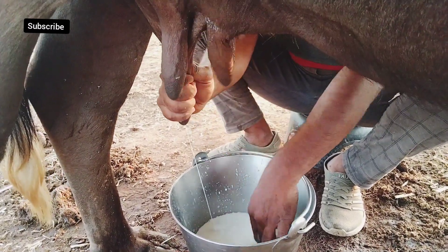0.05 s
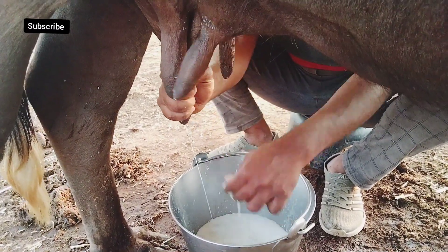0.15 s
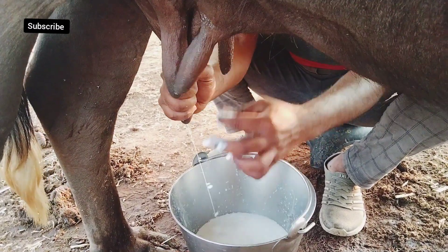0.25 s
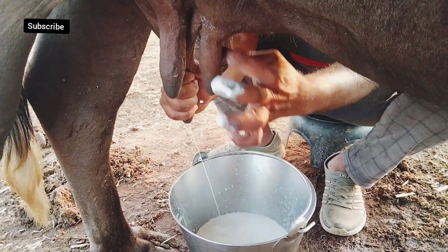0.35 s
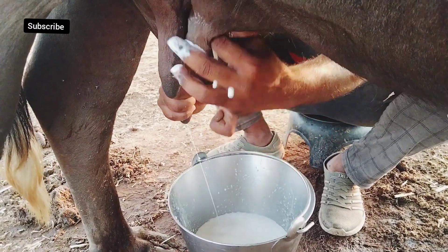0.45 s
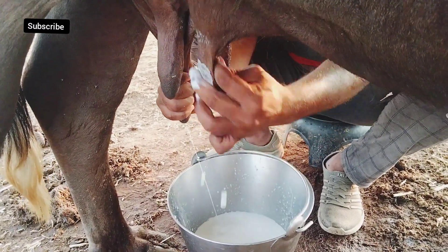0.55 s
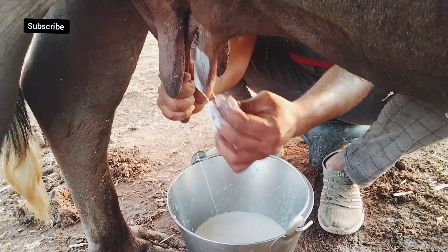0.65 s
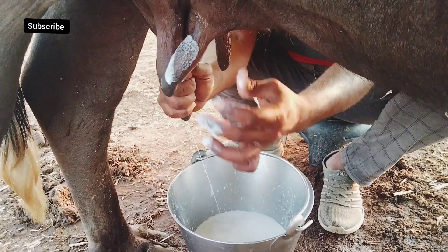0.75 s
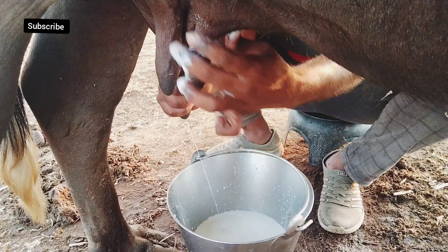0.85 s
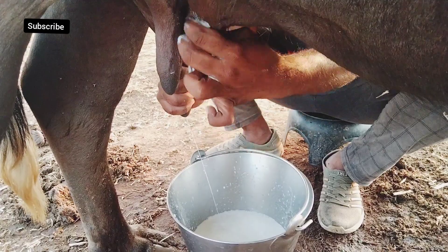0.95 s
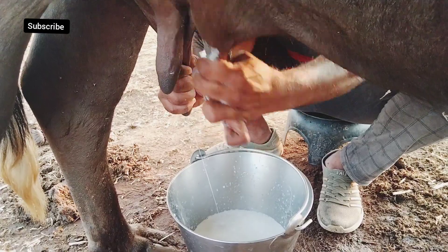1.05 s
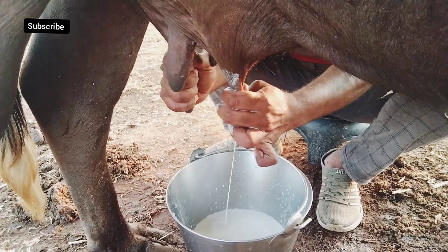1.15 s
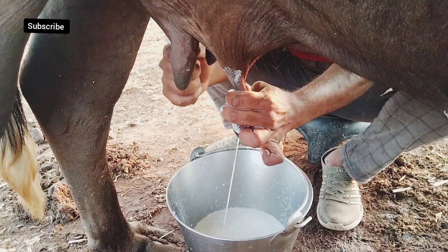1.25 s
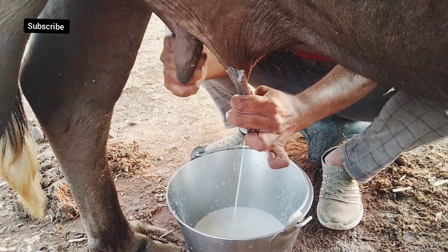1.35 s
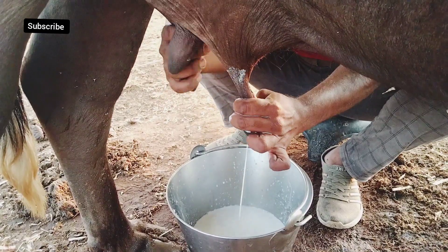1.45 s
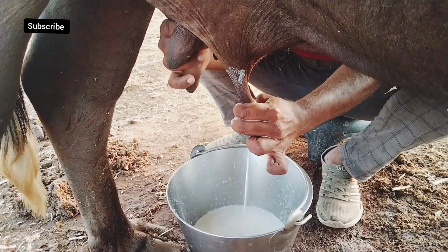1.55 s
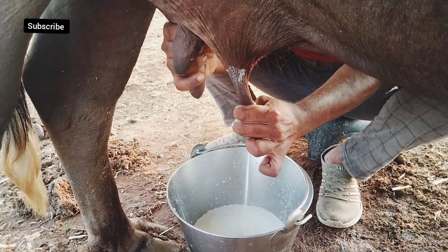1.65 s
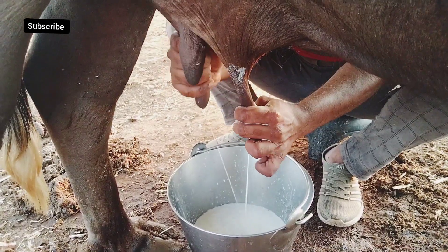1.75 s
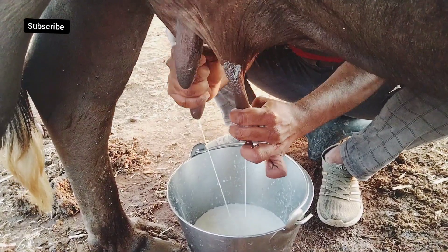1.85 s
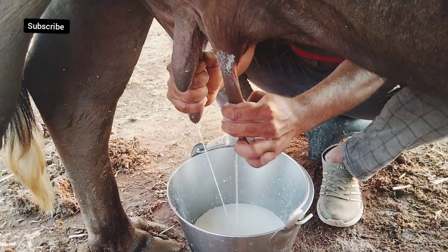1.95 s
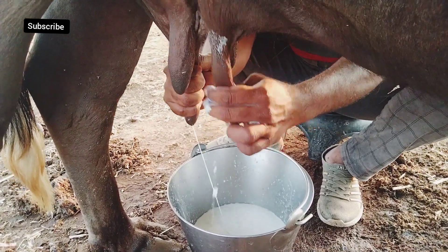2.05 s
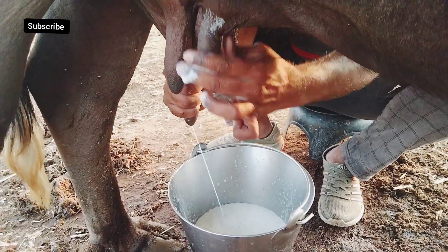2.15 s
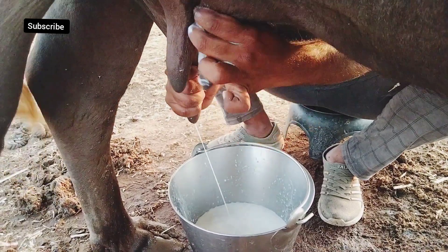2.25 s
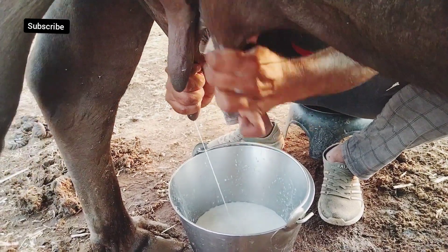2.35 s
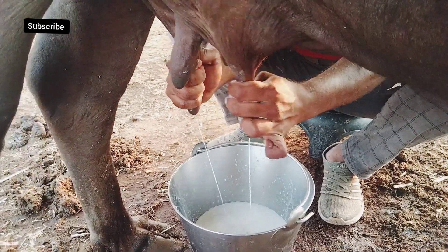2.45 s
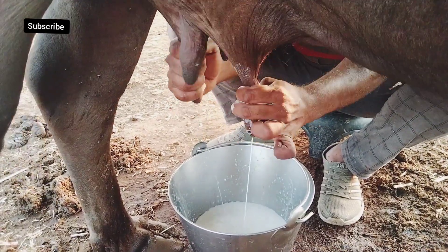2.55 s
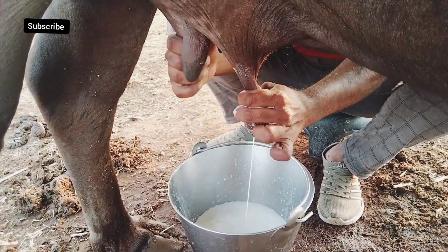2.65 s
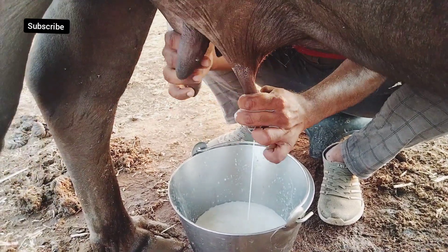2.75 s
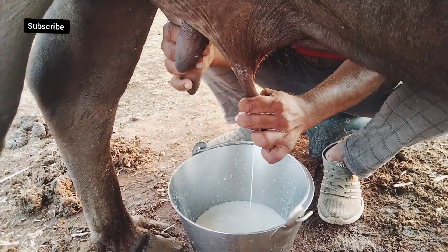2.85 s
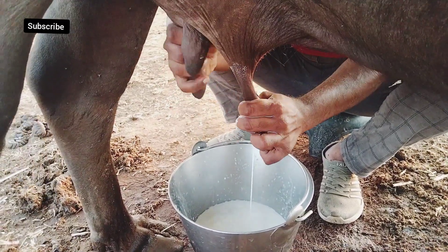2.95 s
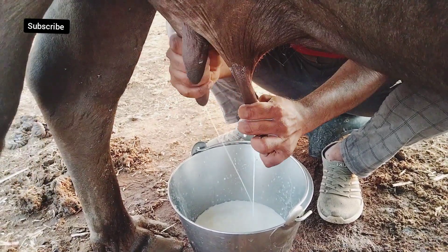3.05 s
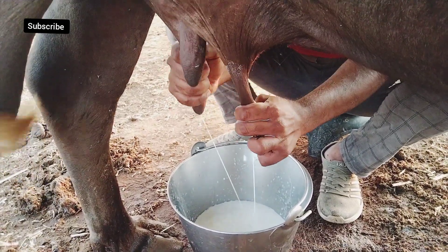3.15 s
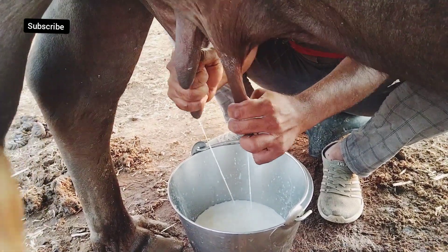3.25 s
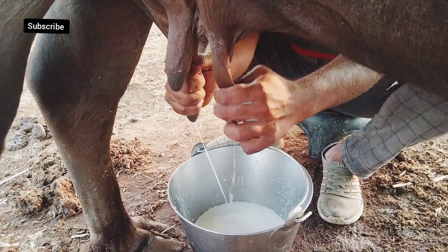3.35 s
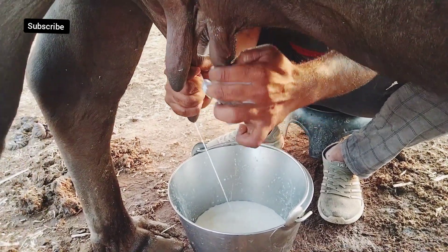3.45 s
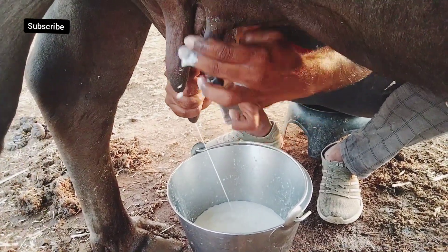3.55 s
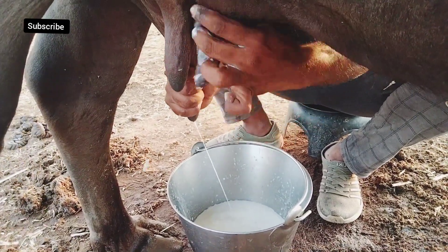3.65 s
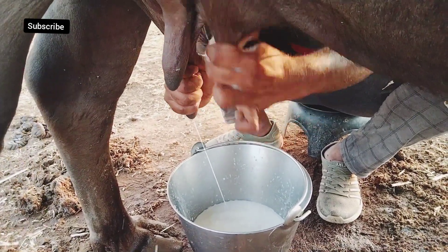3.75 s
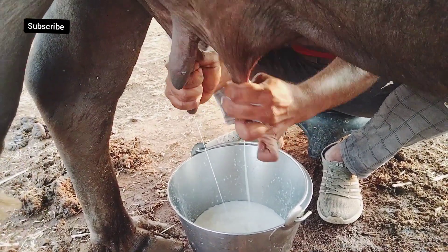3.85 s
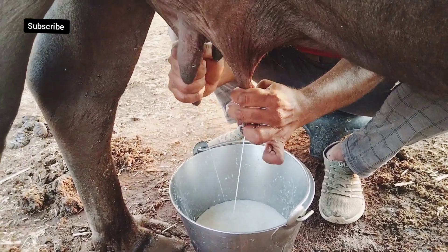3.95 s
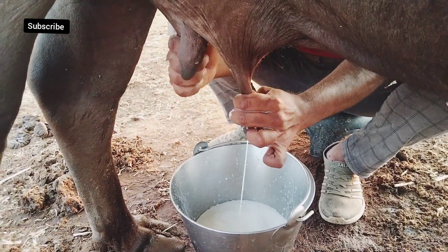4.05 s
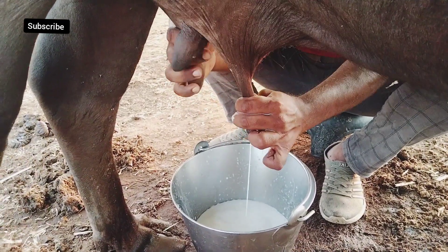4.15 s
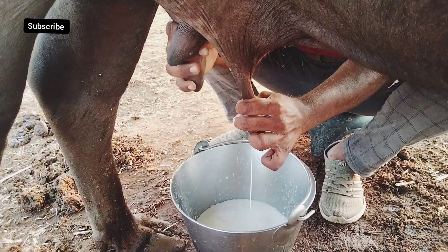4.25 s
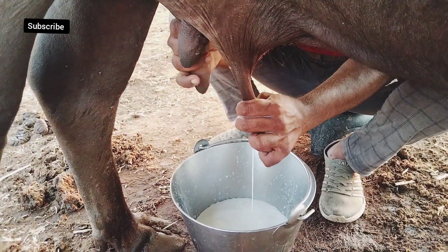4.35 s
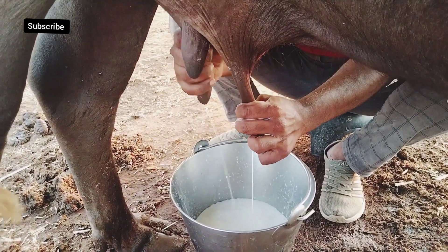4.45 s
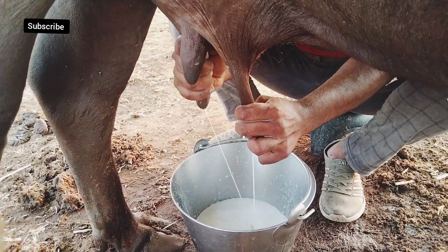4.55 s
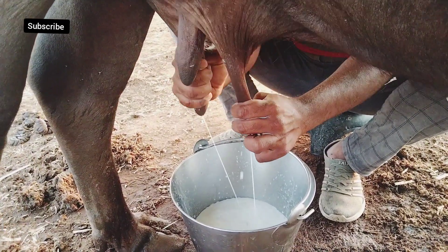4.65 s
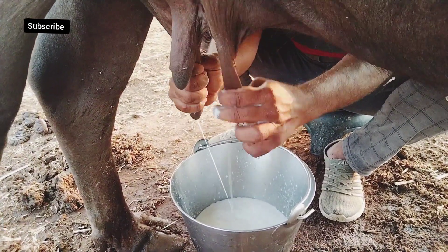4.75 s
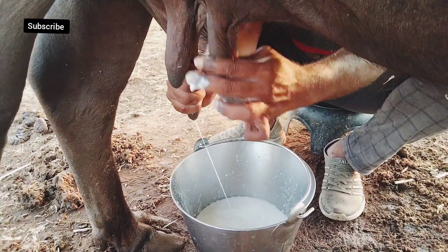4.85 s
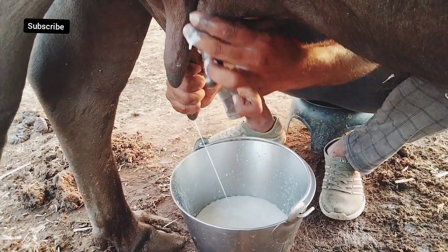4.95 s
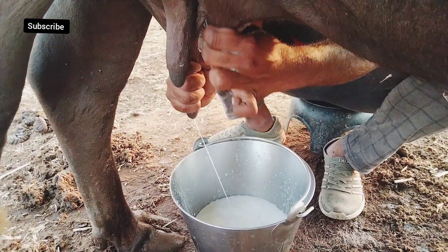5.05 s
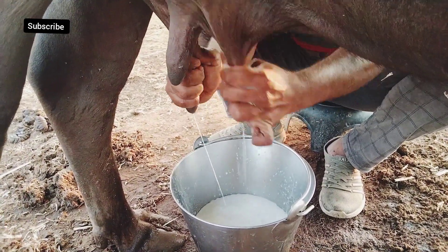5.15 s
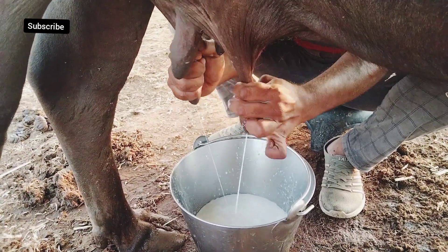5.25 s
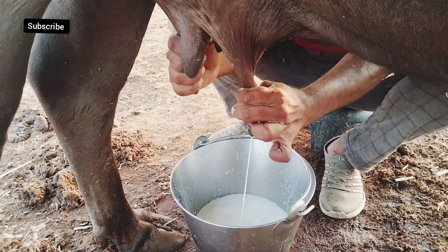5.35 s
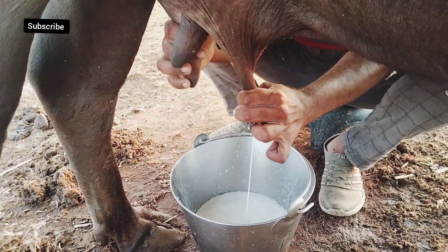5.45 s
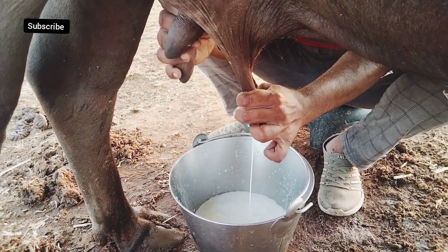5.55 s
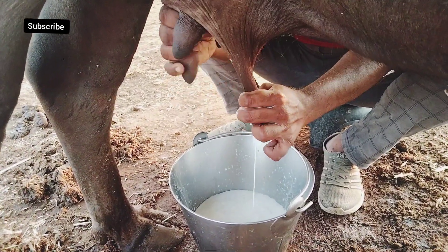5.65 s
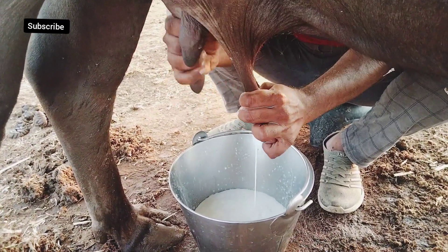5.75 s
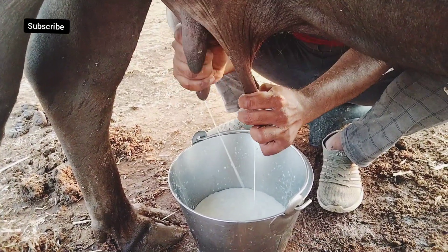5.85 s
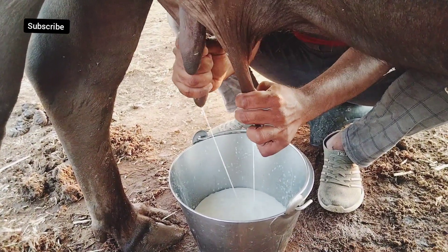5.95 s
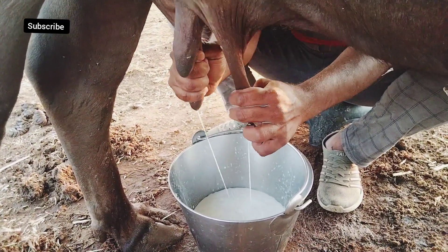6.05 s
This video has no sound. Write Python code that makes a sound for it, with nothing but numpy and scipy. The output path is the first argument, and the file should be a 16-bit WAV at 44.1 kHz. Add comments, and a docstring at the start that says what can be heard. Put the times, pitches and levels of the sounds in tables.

```python
"""A thin jet of milk dies away in a half-full steel bucket outdoors; a small neck bell is struck, far birds chirp,
then two hand-milked jets spurt in turn, close to a phone. Random impacts of the broken jets excite resonances of
the air over the milk and of the steel wall; foam bubbles, gulps and the bell are decaying tones, splats and mist
shaped noise, thuds a low tone with rumble. Thin whistles rise as some spurts run out; the bell sounds once more."""
import sys
import numpy as np
from scipy import signal
from scipy.fft import rfft, irfft
from scipy.io import wavfile
from scipy.ndimage import uniform_filter1d, minimum_filter1d

SR = 44100
rng = np.random.default_rng(int(sys.argv[2]) if len(sys.argv) > 2 else 0)


def ratio(d):
    """dB to gain"""
    e = np.asarray(d, float) / 20
    return 10 ** e


def wav_out(sig):
    """Save sig, one row per channel (or a flat mono array), as 16-bit PCM at SR to the path in sys.argv[1]."""
    wavfile.write(sys.argv[1], SR, np.round(np.clip(np.atleast_2d(sig).T, -1, 1) * 32767).astype(np.int16))


N = 269451
T = np.arange(N) / SR


def unit(x):
    """Normalisation to an rms of 1."""
    return x / np.sqrt(np.mean(x ** 2))


def add(out, s, burst):
    """Superposition: mix a burst in at time s."""
    i = int(s * SR)
    out[i:i + len(burst)] += burst[:N - i]


def resonate(x, peaks):
    """Parallel second-order resonances (f/Hz, width/Hz, level/dB), summed with alternating sign."""
    out = 0
    for k, (hz, width, db) in enumerate(peaks):
        b, a = signal.iirpeak(hz, hz / width, SR)
        out = out + (-1) ** k * ratio(db) * signal.lfilter(b, a, x)
    return out


def ring(x, hz, width):
    """Two resonances in cascade give one with steep skirts, at an rms of 1."""
    once = resonate(x, [(hz, width, 0)])
    return unit(resonate(once, [(hz, 2 * width, 0)]))


def colour(x, points):
    """Spectral shaping: weight x by a curve of (f/Hz, level/dB) and set its rms to 1."""
    hz, db = np.transpose(points)
    log_f = np.log(np.fft.rfftfreq(N, 1 / SR) + 1)
    return unit(irfft(rfft(x) * ratio(np.interp(log_f, np.log(hz), db)), N))


def walk(rate):
    """Slow random modulation: levels held for 1 / rate s, smoothed twice, rms 1."""
    hold = int(SR / rate)
    steps = np.repeat(rng.standard_normal(N // hold + 1), hold)
    smooth = uniform_filter1d(uniform_filter1d(steps, hold), hold)
    return unit(smooth[:N])


def swell(start, length):
    """Half-sine envelope: a soft rise and fall between 0 and 1."""
    return np.abs(np.sin(np.pi * np.clip((T - start) / length, 0, 1)))


def patter(per_s, spread_db, hiss):
    """Shot noise: random impacts of uneven, bounded size over a share of smooth noise."""
    hit = rng.random(N) < per_s / SR
    size = np.minimum(rng.exponential(size=N), 3)
    sign_noise, smooth_noise = rng.standard_normal((2, N))
    return unit(hit * ratio(spread_db * size) * np.sign(sign_noise)) + hiss * smooth_noise


def glide(length, hz0, hz1, wobble_db, shake_hz=25, ease=0):
    """Frequency modulation: an unsteady tone slides from hz0 to hz1; ease slows both ends of the slide."""
    t = T[:int(length * SR)]
    shake = unit(uniform_filter1d(rng.standard_normal(N // 4), size=110))[:len(t)]
    way = t / length - ease * np.sin(2 * np.pi * t / length) / (2 * np.pi)
    hz = hz0 + (hz1 - hz0) * way + shake_hz * shake
    tone = np.sin(2 * np.pi * np.cumsum(hz) / SR)
    return t, tone * np.sqrt(np.sin(np.pi * t / length)) * ratio(wobble_db * shake[::-1])


def field():
    """Broadband noise: faint, wavering outdoor air."""
    # spectrum of the air: f/Hz, relative density/dB
    air_spectrum = [(40, 4), (450, 3), (1700, 0.5), (15500, -12)]
    return colour(rng.standard_normal(N), air_spectrum) * ratio(-73 + 1.5 * walk(8))


def birds():
    """Frequency glides with amplitude warble, scattered into a faint tail of echoes from around the yard."""
    # chirps: start t/s, length t/s, from f/Hz, to f/Hz, level/dB, warble f/Hz
    chirps = [(0.501, 0.12, 3840, 3070, -71.5, 23), (0.672, 0.08, 3660, 3120, -63, 40),
              (0.86, 0.27, 4340, 4330, -75, 44), (1.051, .11, 3780, 2970, -55, 50),
              (1.556, 0.061, 3200, 2930, -66, 44)]
    out = np.zeros(N)
    for s, length, hz0, hz1, db, warble in chirps:
        t, tone = glide(length, hz0, hz1, wobble_db=0.0)
        add(out, s, ratio(db) * tone * (1 + .5 * np.sin(2 * np.pi * warble * t)))
    t = T[:SR // 4]
    echoes = ratio(-43.0) * rng.standard_normal(len(t)) * np.exp(-t / 0.067)
    return out + signal.fftconvolve(out, echoes)[:N]


def thuds():
    """Damped oscillation: dull blows through the ground, a very short low tone over decaying rumble."""
    # hoof or knee on the ground: t/s, level/dB, f/Hz, rumble t60/s
    blows = [(0.366, -40, 191, 0.39), (2.862, -37, 174.5, 0.42)]
    out, t = np.zeros(N), T[:SR // 3]
    for s, db, hz, t60 in blows:
        knock = np.sin(2 * np.pi * hz * t) * np.exp(-t / 0.0092)
        rumble = 0.33 * ring(rng.standard_normal(len(t)), hz, 1.1 * hz)
        add(out, s, ratio(db) * (knock + rumble * 1000. ** (-t / t60)))
    return out


def bell():
    """Modal vibration: each blow is a bright clapper tick, then close pairs of modes that beat and fade."""
    # modes in close pairs: f/Hz, level/dB, t60/s,
    # lean (how far the clapper's favour raises or lowers the mode), share of the level change
    modes = [(1954, -5.5, 3.05, -1.3, 0.45), (2004, 8.5, 1.27, 0.31, 1.48), (5060, -7.5, 0.96, -0.51, 0.56),
             (5014, 4.5, 1.22, 0.36, 0.18), (9075, 8, 0.64, -0.49, 0.083), (9114, 3.5, 0.42, 0.88, 0.47),
             (14150, -2, 0.44, -0.51, .05), (14200, 3, 0.35, 1, .05)]
    # blows: t/s, level/dB, clapper's favour level/dB, then an extra level change:
    # level before/dB, level after/dB, wait until it changes t/s
    blows = [(0.644, -44.5, -3.5, -14, -0.5, 0.086), (4.001, -51, 13, -0.5, -40, 0.11)]
    change_s = 0.21  # the low modes swell after the first blow and fade fast after the second
    out = np.zeros(N)
    for s, db, favour_db, before_db, after_db, wait in blows:
        t = np.maximum(T - s, 0)
        change_db = before_db + (after_db - before_db) * np.clip((t - wait) / change_s, 0, 1)
        tick = ring(rng.standard_normal(N), 5700, 5400) * np.minimum(t / 0.002, 1) * np.exp(-t / 0.012)
        out += ratio(db - 5) * tick
        for hz, mode_db, t60, lean, share in modes:
            tone = np.sin(2 * np.pi * hz * t) * np.minimum(t / 0.006, 1) * 1000. ** (-t / t60)
            out += ratio(db + mode_db + lean * favour_db + share * change_db) * tone
    return out


def whistles():
    """Frequency glide with noisy amplitude: thin, breathy rising tones near the end of some spurts."""
    # tones: start t/s, length t/s, from f/Hz, to f/Hz, level/dB, pitch shake f/Hz
    rising_tones = [(1.88, 0.11, 3450, 5120, -49.5, 51), (2.408, 0.18, 6250, 6900, -68, 30),
                    (2.641, .32, 6930, 7800, -58, 420), (3.782, 0.16, 4900, 6430, -66.5, 45.3),
                    (5.081, 0.27, 3510, 5200, -61.5, 45)]
    out = np.zeros(N)
    for s, length, hz0, hz1, db, shake_hz in rising_tones:
        tone = glide(length, hz0, hz1, wobble_db=3, shake_hz=shake_hz, ease=.7)[1]
        breath = unit(uniform_filter1d(rng.standard_normal(N // 4), 150))[:len(tone)]
        add(out, s, ratio(db) * tone * (1 + 0.45 * breath))
    return out


def splats():
    """Decaying noise: drops and slaps are short bursts around a centre with a little broad noise."""
    # drops and slaps on foam and wall: t/s, level/dB, centre f/Hz
    slaps = [(0.18, -60, 3500), (0.2787, -57.5, 1940), (0.366, -43.5, 3060), (0.381, -43.5, 2720),
             (0.547, -54.5, 6500), (0.8163, -55, 2780), (1.24, -60, 2140), (1.273, -41, 1880),
             (1.74, -34.5, 2540), (2.1278, -32, 2270), (2.139, -35.5, 4800), (2.1755, -35, 2700),
             (2.4405, -62, 12500), (2.4953, -53, 13400), (2.578, -42.5, 4850), (2.5635, -39.5, 1950),
             (2.594, -39.5, 2960), (2.6157, -36.5, 1170), (2.682, -43.5, 2670), (3.5233, -30.5, 2520),
             (3.917, -61, 9000), (4.018, -41, 4900), (4.473, -42, 4960), (4.5262, -41, 2450),
             (4.839, -55, 5800), (4.9977, -42, 2500), (5.31, -47, 4800), (5.3813, -34.5, 1470),
             (5.4116, -30, 2050), (5.479, -41, 1700), (5.618, -35.5, 2000)]
    out, t = np.zeros(N), T[:SR // 5]
    for s, db, hz in slaps:
        noise = rng.standard_normal(len(t))
        body = ring(noise, hz, 0.71 * hz) + 0.04 * np.diff(noise, prepend=0)
        add(out, s, ratio(db) * body * np.minimum(t / 0.002, 1) * 1000. ** (-t / 0.059))
    return out


def gulps():
    """Bubble resonance: air dragged under swells, rings a few cycles and rises in pitch."""
    # big bubbles: t/s, level/dB, starting f/Hz
    big_bubbles = [(1.275, -30.5, 420), (1.298, -27, 445), (1.319, -28.5, 373), (1.479, -31, 429),
                   (1.372, -33.5, 354), (1.548, -26.5, 445), (2.663, -27, 357), (2.739, -26.5, 385),
                   (3.406, -31.5, 424), (3.445, -30.5, 405), (4.033, -23.5, 345), (4.18, -32, 367),
                   (4.638, -23, 421), (5.176, -27.5, 363), (5.426, -29, 411), (5.633, -22.5, 362),
                   (5.798, -31, 563)]
    out, t = np.zeros(N), T[:SR // 10]
    for s, db, hz in big_bubbles:
        shape = t / 0.0042 * np.exp(1 - t / 0.004)
        add(out, s, ratio(db) * shape * np.sin(2 * np.pi * hz * t * (1 + 3 * t)))
    return out


def bubbles(splash_db):
    """Bubble resonance in miniature: foam bubbles burst as short upward glides of very uneven size."""
    count, low_hz, high_hz = 1200, 1095, 2000
    decay_cycles, level_db = 6.1, -8.5  # level against the splash
    out, t = np.zeros(N), T[:SR // 30]
    for when, pitch, size in rng.random((count, 3)):
        cycles = low_hz * (high_hz / low_hz) ** pitch * t
        tone = np.sin(2 * np.pi * cycles * (1 + 0.0077 * cycles))
        tone = tone * np.minimum(cycles / 2.7, 1) * np.exp(-cycles / decay_cycles)
        add(out, when * T[-1], ratio(-9 * size) * tone)
    return unit(out) * ratio(splash_db + level_db)


def spray(missing_db):
    """Band-filtered shot noise: fine mist in treble bands that flicker alone; the lower ones lose more level."""
    # mist: f/Hz, relative band level/dB, extra loss as a share of the missing drive
    mist_bands = [(7640, -5.5, 0.95), (9000, -2.5, 0.67), (10400, -1.5, .2), (11900, -0.5, 0.1),
                  (15400, -0.5, .1)]
    hz, db, loss = np.transpose(mist_bands)
    mist = patter(5000, 4.5, 0.6)
    out = 0
    for k, f in enumerate(np.arange(7600, 15800, 600)):
        band_db = np.interp(f, hz, db) + np.interp(f, hz, loss) * missing_db + 2.8 * walk(22.21)
        out = out + (-1) ** k * ratio(band_db) * ring(mist, f, 480)
    return 0.28 * out


def trickle():
    """Narrow-band resonance: a faint drive lets sharp bands hum alone; foam rustles in the treble."""
    # hum of the bucket air as a last thin jet dies away: t/s, level/dB
    hum_level = [(0, -40.5), (.1, -50.5), (.5, -52.5), (.62, -58), (.9, -59.5), (1.04, -74), (1.1, -110)]
    # narrow bands that hum on for a while: f/Hz, width f/Hz, level/dB, from t/s, to t/s
    narrow_bands = [(264, 26, -69, -1.1, 0.6), (350, 66, -54.5, -0.9, .55), (663, 61, -63.5, -1, .55),
                    (1026, 63, -58, -0.85, 0.3), (1818, 47, -61.5, 0.16, 0.3),
                    (1700, 45, -73.5, 0.52, 0.99), (3405, 73, -65, -1, 0.35), (4330, 80, -77, -.5, 0.75),
                    (5030, 73, -87, -0.9, 0.34)]
    # foam rustles: start t/s, length t/s, level/dB
    foam_rustles = [(0.15, 0.19, -65.5), (0.345, 0.082, -57.5), (.39, 0.11, -70)]
    hum_db = np.interp(T, *np.transpose(hum_level))
    out = ratio(hum_db) * ring(rng.standard_normal(N), 450, 65)
    for hz, width, db, start, end in narrow_bands:
        envelope = ratio(db + 2.3 * walk(38.5)) * np.sqrt(swell(start, end - start))
        out = out + envelope * ring(patter(1500, 4.8, 0.42), hz, width)
    rustle = sum(ratio(db) * swell(s, length) ** 2 for s, length, db in foam_rustles)
    return out + rustle * ratio(3.3 * walk(59.5)) * spray(-1)


def spurts():
    """Energy addition: powers of overlapping spurts (rise, hold, taper, stop) sum to each layer's level in dB."""
    # start t/s, length t/s, rise t/s, taper t/s as the squeeze runs out, plunge level/dB, fizz level/dB
    squeezes = [(-.3, 0.84, 0.04, 0.72, -61.5, -65), (1.228, 1.318, 0.075, 0.28, -39, -56.5),
                (1.354, 0.61, 0.37, 0.12, -60, -46), (2.033, 0.44, 0.095, 0.4, -40, -49.5),
                (2.537, 1.367, 0.01, 0.47, -38, -54.5), (2.663, 1.41, 0.23, 0.73, -46.5, -54),
                (3.924, 1.47, 0.13, 0.46, -39.5, -53), (4.954, 0.15, 0.049, 0.065, -37, -59.5),
                (5.3, 1.34, 0.1, 0.65, -38, -53.5), (5.424, 0.26, 0.082, 0.18, -41.5, -52.5)]
    # plunge, splash, fizz, spray: lag t/s, level over its column/dB, loss per taper_s level/dB, bend of taper
    # (plunge and splash take the plunge column, fizz and spray the fizz column)
    follow = [(0.026, 0, -6.5, 0.94), (0.011, -10, -3.5, 6), (0.0019, 0.5, -14, 1.02), (0, -7, -9.5, 0.78)]
    taper_s, rise_db, stop_s = .35, -13, 0.024
    out = []
    for k, (lag, over_db, lost_db, bend) in enumerate(follow):
        power = 1e-14
        for s, length, rise, taper, *column_db in squeezes:
            t = T - s - lag
            db = column_db[k // 2] + over_db + rise_db * np.clip(1 - t / rise, 0, 1) ** 2
            db = db + lost_db * (np.maximum(t - length + taper, 0) / taper_s) ** bend
            power = power + ratio(2 * db) * (t > 0) * np.clip((length - t) / stop_s, 0, 1) ** 2
        out.append(10 * np.log10(power))
    return out


def spits():
    """Jet break-up: quick random jumps in drive that relax exponentially in a few ms."""
    jumps = (rng.random(N) < 45 / SR) * np.minimum(rng.exponential(size=N), 2.2)
    relaxed = signal.lfilter([1], [1, -np.exp(-1 / (0.0081 * SR))], jumps)
    return uniform_filter1d(relaxed, size=330)


def drift(x, share):
    """Time-warping: pitch wanders by about this share as the foam and the point of impact move."""
    position = np.arange(N) + np.cumsum(share * walk(4.0))
    return np.interp(position % (N - 1), np.arange(N), x)


def sheet_steel(x):
    """Modal density: closely spaced modes of the thin wall add fine streaks to the hiss."""
    t, chance = T[:SR // 8], rng.random((160, 2))
    hz = 1000 + 90 * (np.arange(160)[:, None] + .7 * chance[:, :1])
    modes = np.sin(2 * np.pi * (hz * t + chance[:, 1:]))
    response = modes.sum(axis=0) * 1000. ** (-t / .06)
    return x + .3 * signal.fftconvolve(x, response / np.linalg.norm(response))[:N]


def jets():
    """Forced resonance: drops of the broken jet ring the bucket air and wall; all layers share its sputter."""
    # resonances of the air over the milk: f/Hz, width f/Hz, relative level/dB
    air_modes = [(206.7, 44.6, -8), (308.4, 80.7, -6), (366.5, 41, 1), (445, 51.3, -1), (672, 216, -13.5)]
    # resonances of the steel wall: f/Hz, width f/Hz, relative level/dB
    wall_modes = [(735, 113, -7), (1044, 200, -1), (1276, 214, -0.5), (1600, 220, -11), (2148, 300, 0.5),
                  (2930, 360, 0.5), (3720, 670, -4), (4330, 480, -4.5), (4894, 280, -6), (5460, 510, -5.5),
                  (6060, 1200, -3.5), (7050, 1100, -9.5)]
    # extra loss per wall mode when the drive is weak: share of the missing drive (negative gives some back)
    wall_loss = [-0.46, 0.057, 0.7, -0.74, 0.67, -0.42, 0, .8, -0.32, 0.7, -0.21, -0.51]
    full_fizz_db, wall_db = -57, -5  # drive is missing below full fizz; common offset of the wall modes
    plunge_db, splash_db, fizz_db, spray_db = spurts()
    sputter, spit = walk(45), spits()
    air = resonate(resonate(patter(800, 2.33, 0.76), air_modes), [(389, 610, 0)])
    plunge = unit(air)
    missing_db = np.clip(fizz_db - full_fizz_db, -30, 0)
    hiss = spray(missing_db) * ratio(spray_db + 1.63 * sputter + 2.4 * spit)
    for (hz, width, db), loss in zip(wall_modes, wall_loss):
        # low wall modes follow the splash, high ones the fizz
        share = np.clip(np.log(hz / 1500) / np.log(1.7), 0, 1)
        drive_db = db + splash_db + share * (fizz_db - splash_db + 2.9 * spit)
        # each mode is hit by its own drops and drifts alone; its flicker adds to the shared sputter
        flicker_db = 1.68 * sputter + 1.8 * walk(24.99) + 1.82 * walk(3.1)
        mode = drift(ring(patter(2000, 7.8, 0.34), hz, width), share=.035)
        hiss = hiss + ratio(drive_db + wall_db + loss * missing_db + flicker_db) * mode
    flutter_db = 1.2 * sputter + 1.5 * walk(70)
    return plunge * ratio(plunge_db + flutter_db) + sheet_steel(hiss) + bubbles(splash_db + sputter)


def scene():
    """Superposition of all sources at one microphone."""
    background = field() + birds() + thuds() + bell()
    milk = whistles() + splats() + gulps() + trickle() + jets()
    return (background + milk)[None]


def suppress(x):
    """Spectral subtraction: bins near the noise estimate are turned down, leaving dark gaps and streaks."""
    # set floor of the noise estimate: f/Hz, bin level/dB
    noise_floor = [(110, -106), (2400, -100.5), (4450, -103), (14900, -112)]
    # bands in which the estimate is raised, so that it bites deeper: f/Hz, bin level/dB, from t/s
    raised_bands = [(1847, -73.5, .62), (2520, -87, 0.27), (3400, -81, 1.25), (4580, -81, 1.25),
                    (5500, -92, 0), (6450, -99, 0.083)]
    band_width_hz = 84
    f, t, z = signal.stft(x, SR, nperseg=1024)
    power = np.maximum(uniform_filter1d(np.abs(z) ** 2, size=7, axis=-1), 1e-18)
    hz, db = np.transpose(noise_floor)
    floor = ratio(2 * np.interp(np.log(f + 1), np.log(hz), db))[:, None]
    # the quietest power of each bin over about the last second
    recent = minimum_filter1d(power, size=81, origin=40, axis=-1)
    noise = floor + .7 * recent
    for hz, db, s in raised_bands:
        noise = noise + ratio(2 * db) * np.outer(np.exp(-((f - hz) / band_width_hz) ** 2), t >= s)
    gain = np.clip(1 - noise / power, ratio(-20), 1)
    return signal.istft(z * gain, SR, nperseg=1024)[1][..., :N]


def top_cut(x):
    """Nothing passes above the cut-off."""
    return signal.sosfilt(signal.butter(12, 16470, fs=SR, output="sos"), x)


def record(dry):
    """Band limiting and noise suppression: the phone cuts deep bass and the top and thins faint steady noise."""
    x = signal.sosfilt(signal.butter(2, 70, "high", fs=SR, output="sos"), dry)
    x = signal.sosfilt(signal.ellip(10, .2, 70, 15750, fs=SR, output="sos"), x)
    mix = suppress(x)
    return top_cut(mix)


dry = scene()
out = record(dry)
wav_out(out)
```